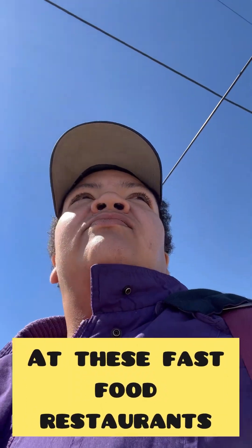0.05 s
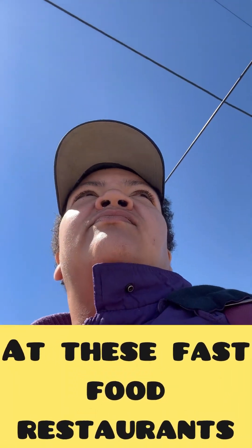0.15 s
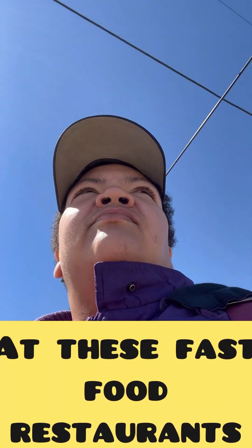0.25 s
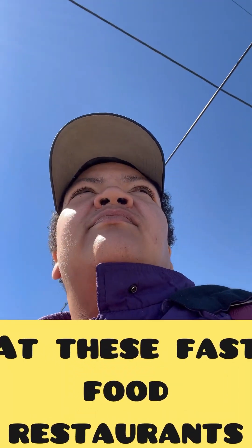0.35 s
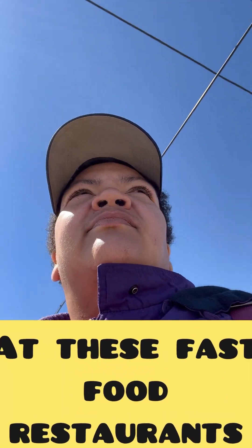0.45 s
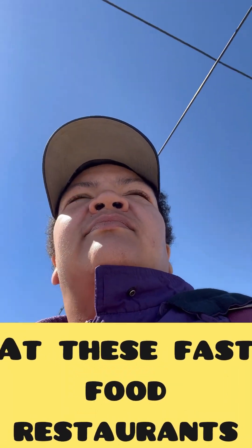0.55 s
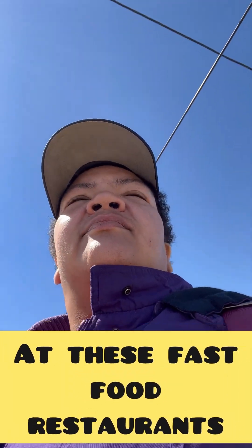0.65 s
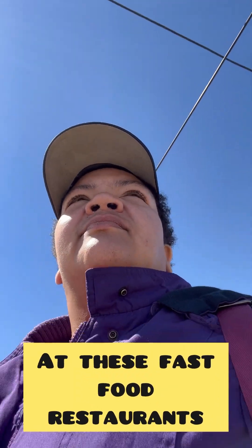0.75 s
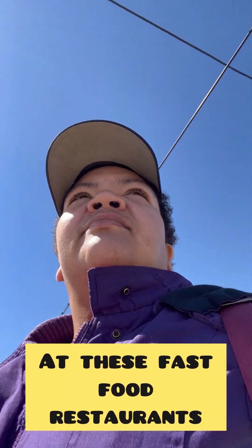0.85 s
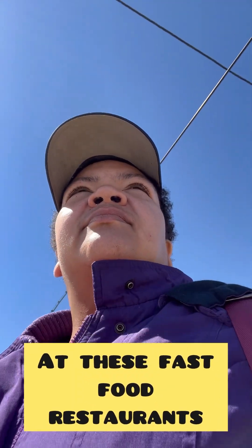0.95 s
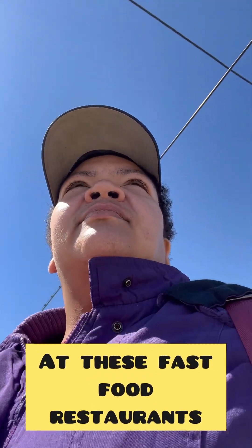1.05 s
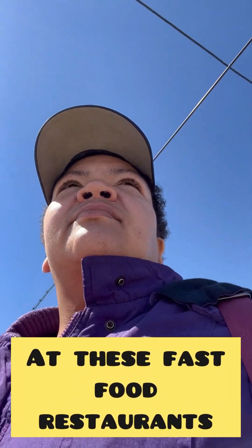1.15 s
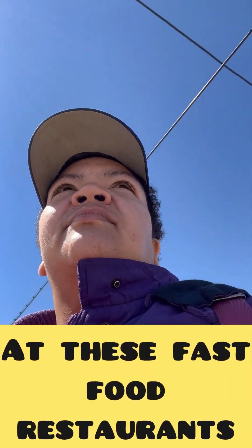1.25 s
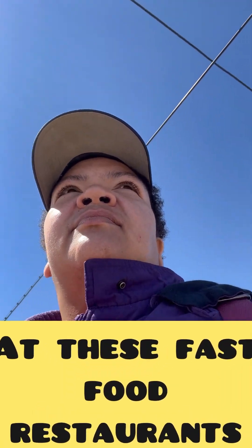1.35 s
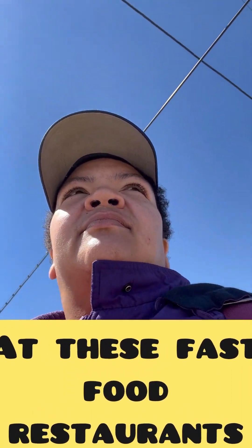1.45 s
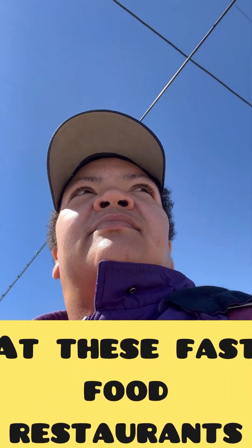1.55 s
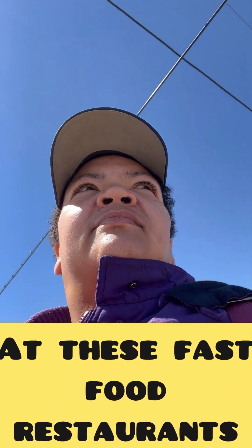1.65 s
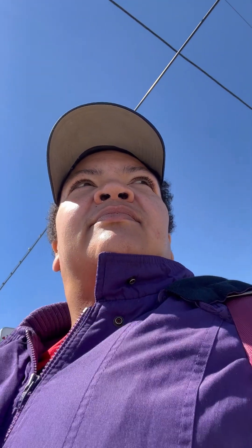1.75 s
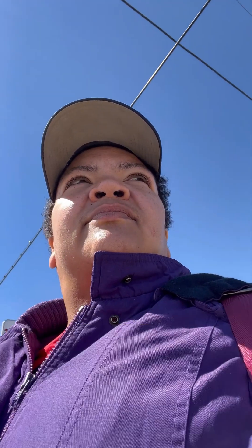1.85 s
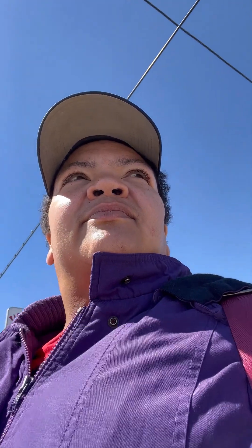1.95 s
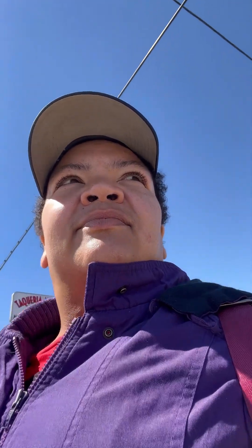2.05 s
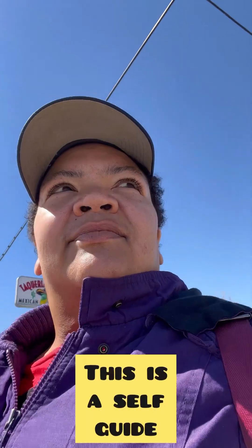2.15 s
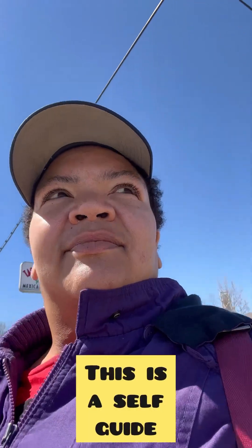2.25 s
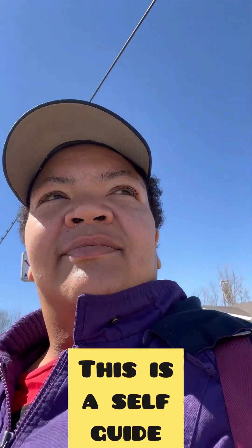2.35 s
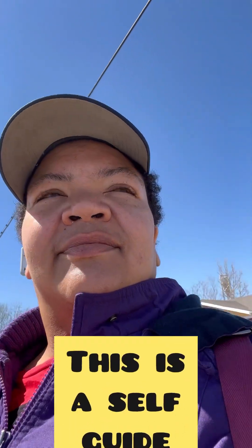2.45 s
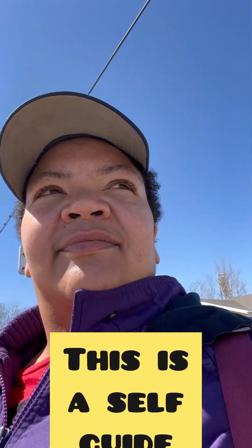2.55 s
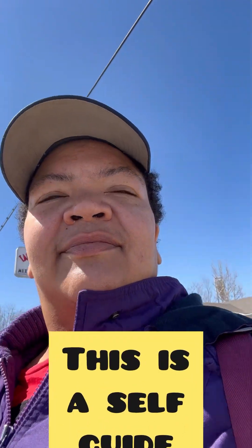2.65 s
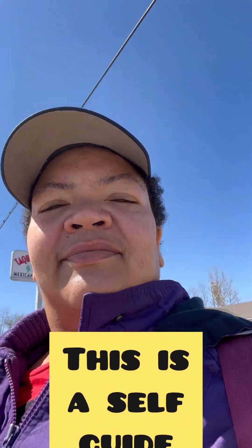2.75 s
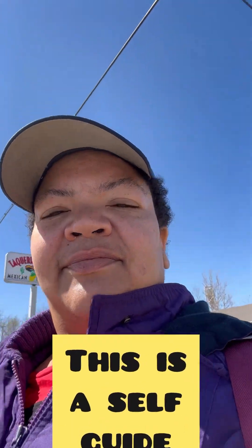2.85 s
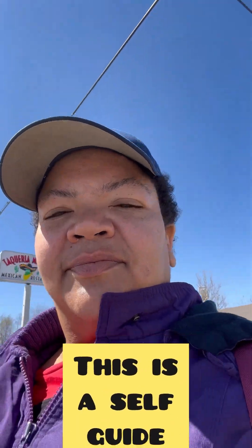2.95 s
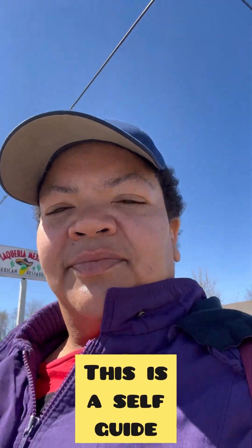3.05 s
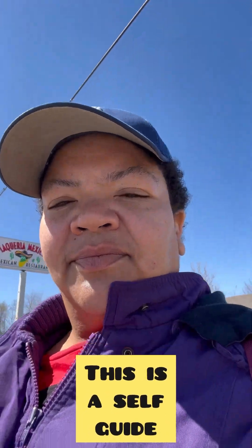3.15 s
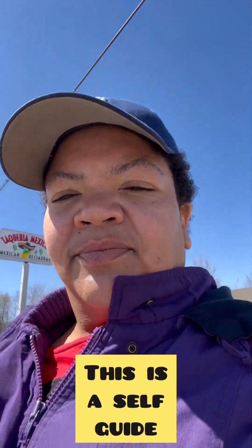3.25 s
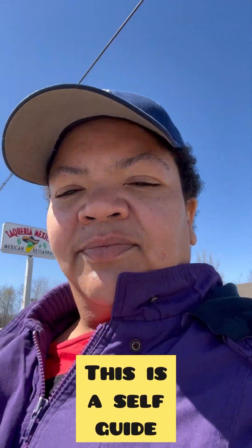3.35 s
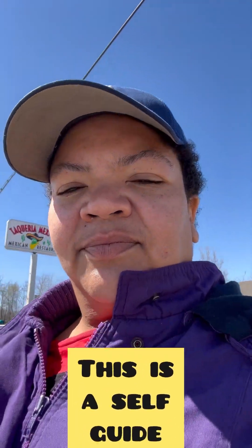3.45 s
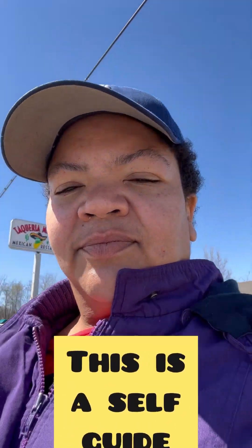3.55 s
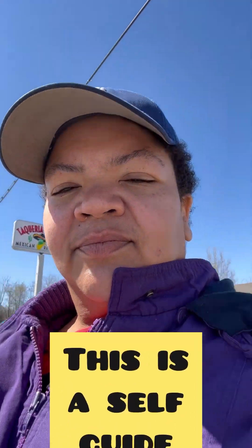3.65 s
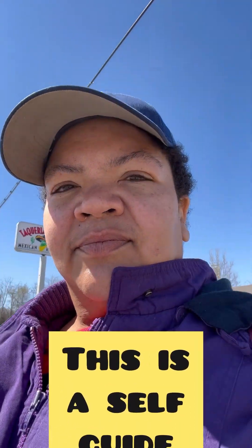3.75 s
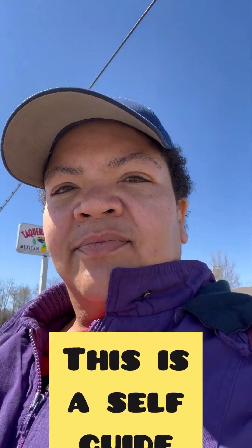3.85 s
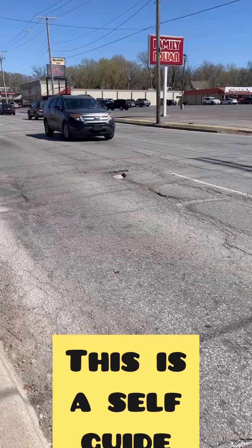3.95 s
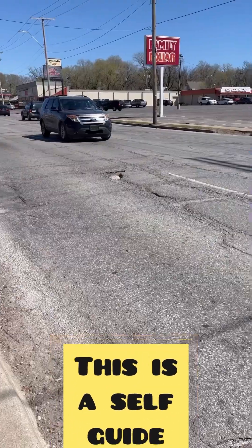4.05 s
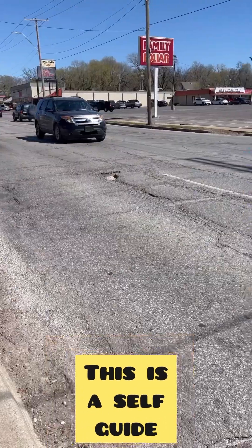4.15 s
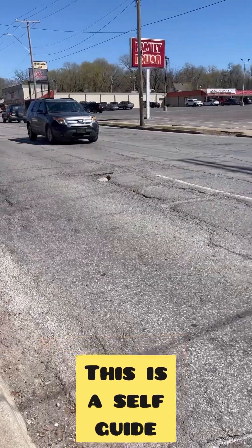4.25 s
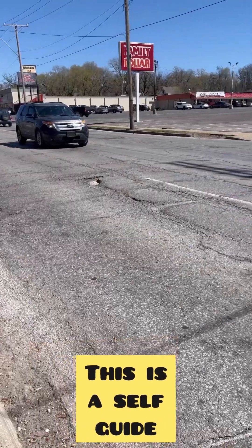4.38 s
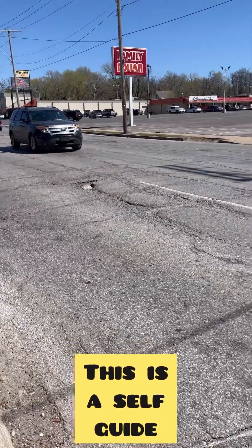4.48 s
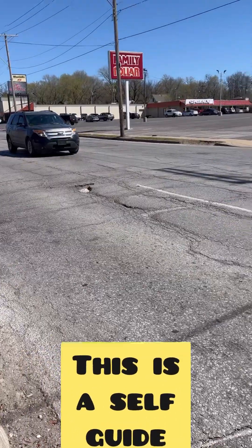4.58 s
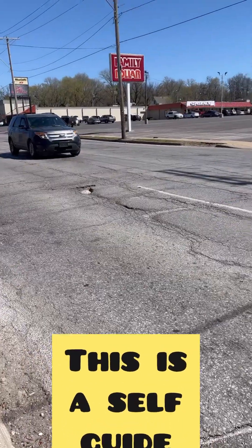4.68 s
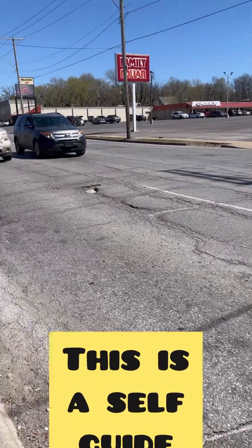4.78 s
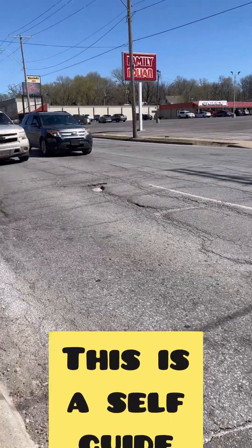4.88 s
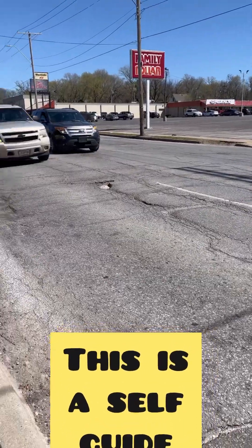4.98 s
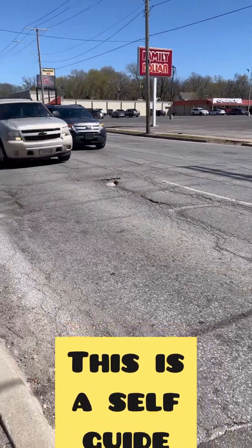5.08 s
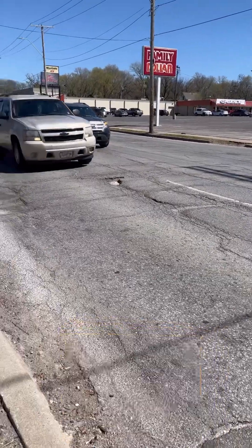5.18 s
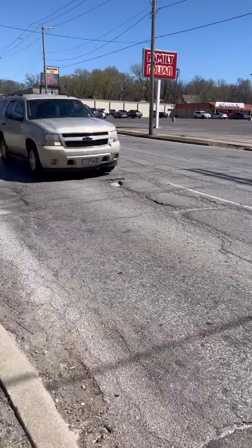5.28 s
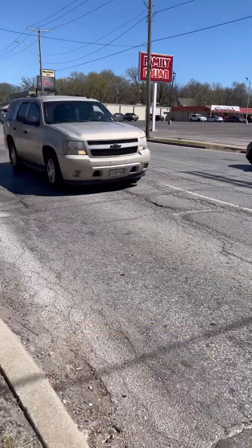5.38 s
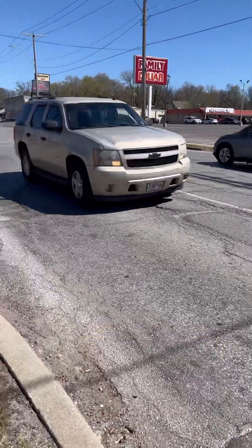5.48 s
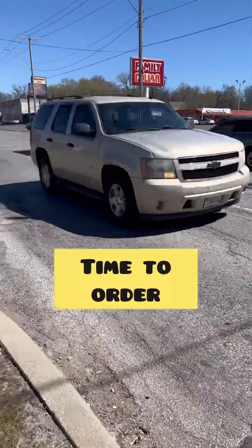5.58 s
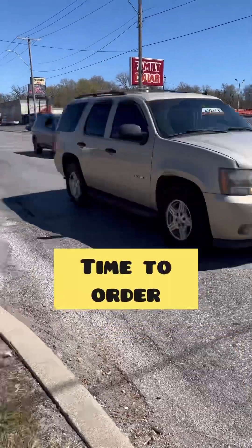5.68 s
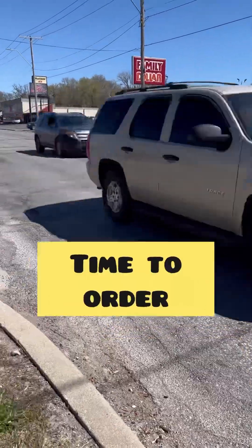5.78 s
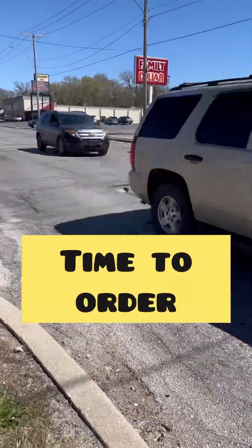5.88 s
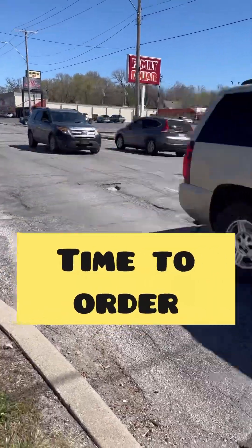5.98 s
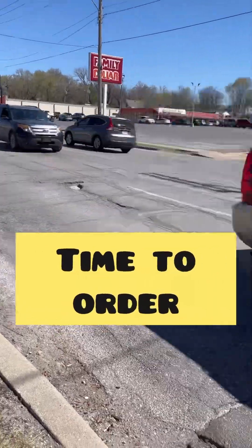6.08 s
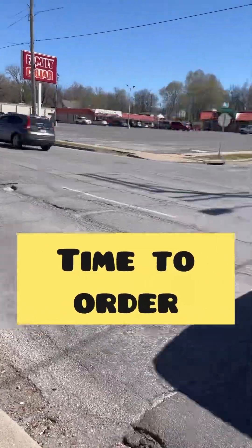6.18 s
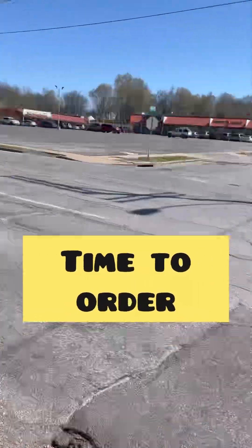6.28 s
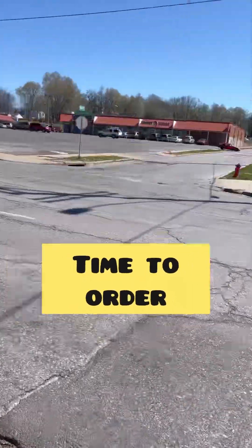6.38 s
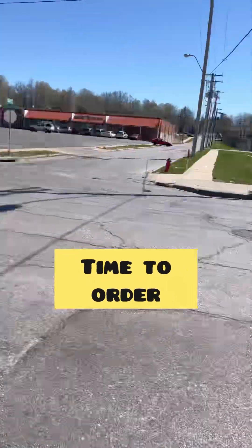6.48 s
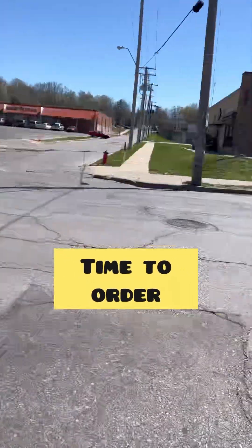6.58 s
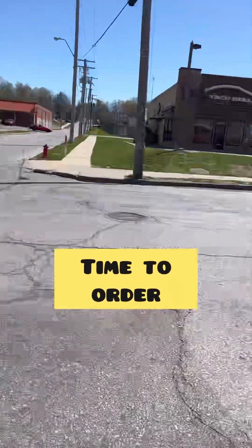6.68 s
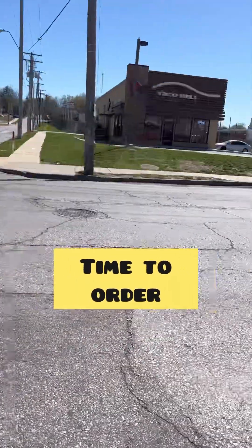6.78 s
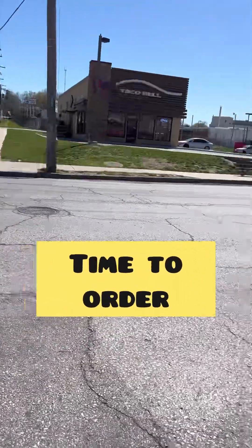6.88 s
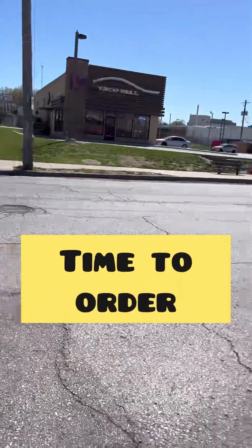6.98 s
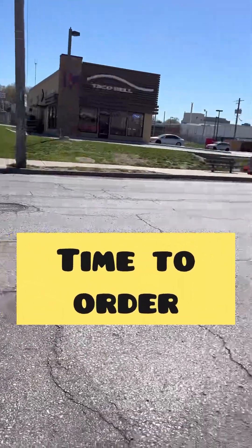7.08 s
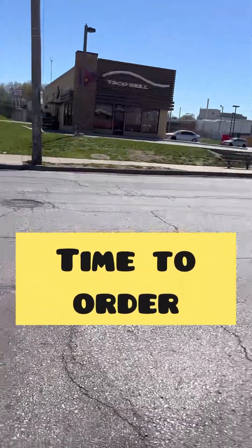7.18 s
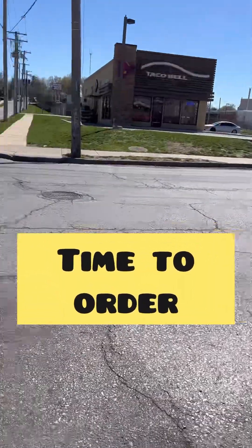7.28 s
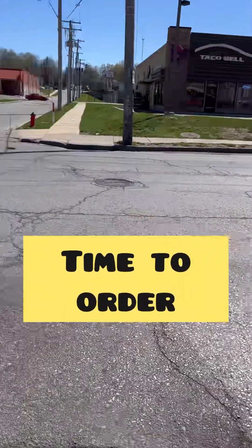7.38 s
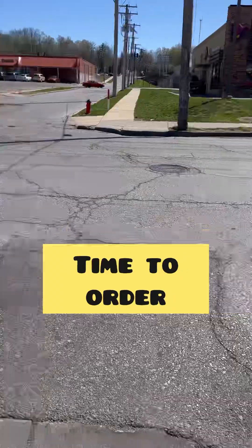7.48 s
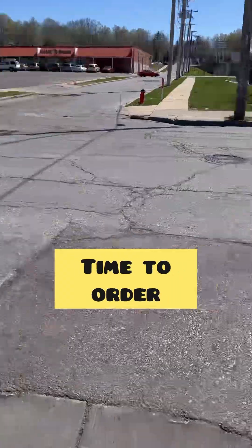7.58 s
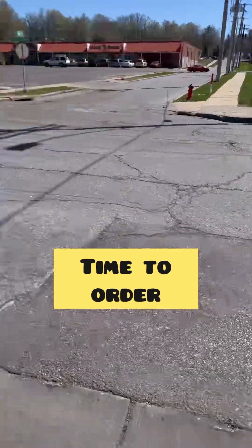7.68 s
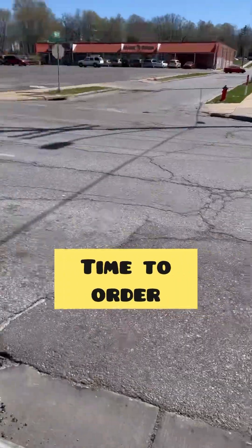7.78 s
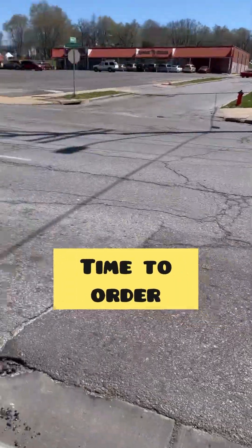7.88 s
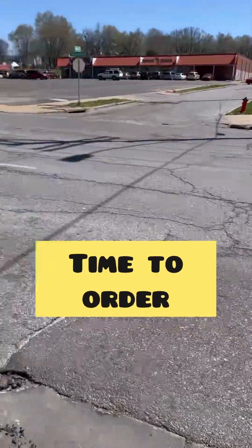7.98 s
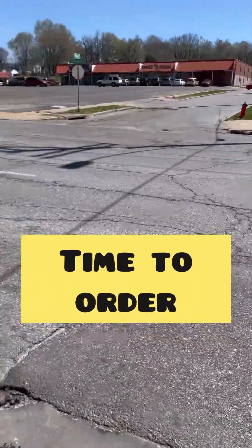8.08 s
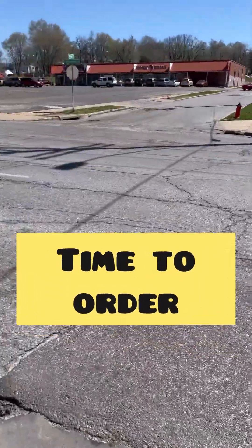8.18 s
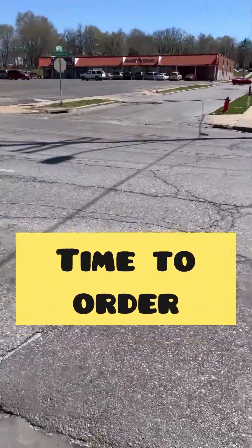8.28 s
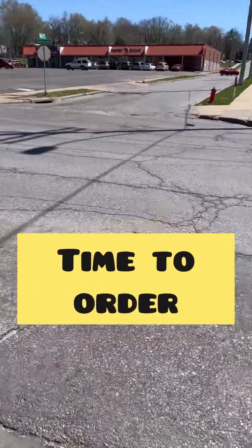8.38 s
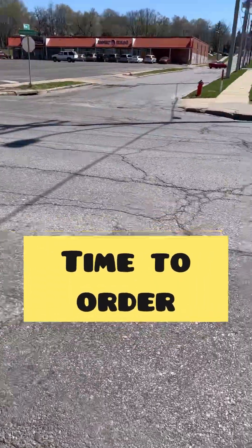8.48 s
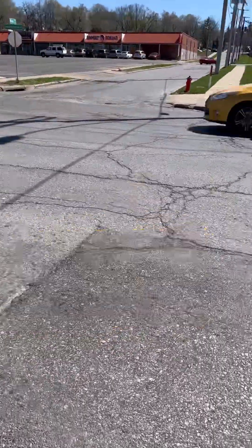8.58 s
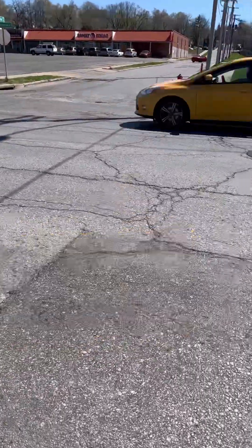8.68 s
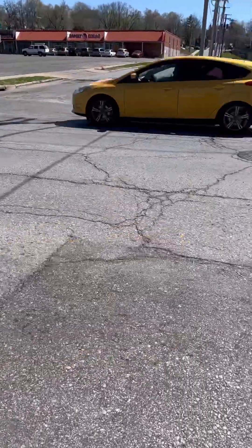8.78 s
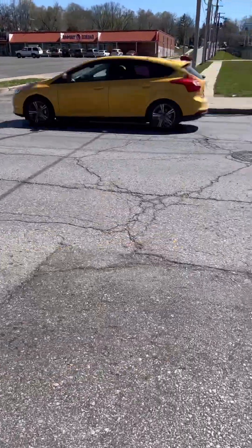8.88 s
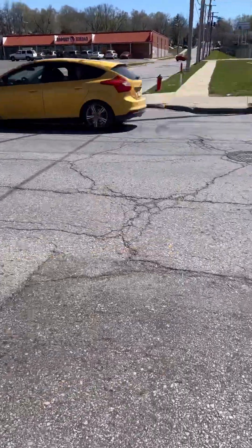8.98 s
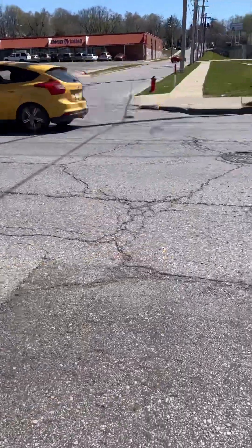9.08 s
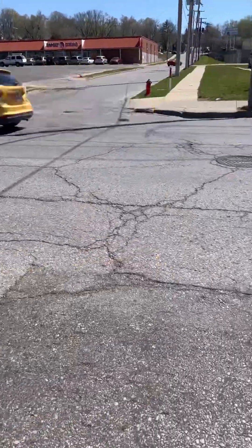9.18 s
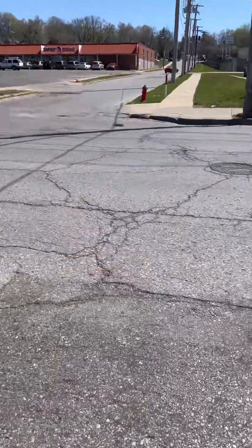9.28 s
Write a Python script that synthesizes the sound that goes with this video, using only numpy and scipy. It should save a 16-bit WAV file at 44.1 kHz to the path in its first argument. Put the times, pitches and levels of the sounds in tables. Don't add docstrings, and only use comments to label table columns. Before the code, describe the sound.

Outdoor kerbside traffic on a hand-held stereo phone, in two takes. From 0 s, low engine drones around a deep hum and broad tyre roar swell as vehicles pass, strongest near 0.4-0.9 s; wind buffets at the start and around 1.3-1.7 s, with a tiny sharp tick at once. Tyres slap a crack at about 1.65 s; a flurry of duller slaps and grit scrapes comes at 3.1-3.5 s. At 3.9 s an abrupt cut changes the street's tone. Faint, very high brake squeals fade over 4.0-4.9 s while cars roll by. A heavy gust hits at 5.45 s, then a large car roars past close, peaking around 5.95 s, with a hard knock at 5.9 s and softer knocks until 6.3 s. It recedes by 7 s. Thinner traffic follows, one knock at 7.5 s, then modest passes and rumbling wind from 8.5 s to the end at 9.3 s.

```python
import sys
import numpy as np
from scipy import signal
from scipy.fft import rfft, irfft, dct, next_fast_len
from scipy.io import wavfile
from scipy.ndimage import uniform_filter1d

SR = 44100
rng = np.random.default_rng(int(sys.argv[2]) if len(sys.argv) > 2 else 0)


def voltage_ratio(decibels):
    exponent = np.asarray(decibels, float) / 20
    return 10 ** exponent


def store_pcm(level_fs):
    pcm = np.round(np.clip(level_fs, -1, 1) * 32767).astype(np.int16)
    wavfile.write(sys.argv[1], SR, np.atleast_2d(pcm).T)


N = 411453
TIME = np.arange(N) / SR
CUT = 3.917
# (start [s], end [s])
SHOTS = [
    (0, CUT),
    (CUT, 9.34),
]
FRAME, GRID = 1024, 237


def unit(x):
    return x / np.sqrt(np.mean(x ** 2) + 1e-20)


def bell(x, width):
    return np.exp(-(x / width) ** 2)


def along(points, hz):
    f, *cols = np.transpose(points)
    outside = (-120, -120) if len(cols) == 1 else ()
    return [np.interp(np.log(hz + 1), np.log(f + 1), c, *outside) for c in cols]


def curves(rows):
    s, *cols = np.transpose(rows)
    return [np.interp(TIME, s, c) for c in cols]


def wobble(rate, size=N):
    knots = int(size * rate / SR) + 2
    return np.interp(np.arange(size) * rate / SR, np.arange(knots), rng.standard_normal(knots))


def filtered(x, response):
    m = next_fast_len(x.shape[-1] + 8192)
    return irfft(rfft(x, m) * response(np.fft.rfftfreq(m, 1 / SR)), m)[..., :x.shape[-1]]


def in_shot(rows, shot):
    return [row for row in rows if (row[0] > CUT) == shot]


def spans():
    return [slice(round(a * SR), min(round(b * SR), N)) for a, b in SHOTS]


def rush(spectrum, patchy_db, size, moving_db=lambda hz, t: 0):
    hz, t, z = signal.stft(rng.standard_normal((2, size + 512)), SR, nperseg=512)
    field = uniform_filter1d(rng.standard_normal(z.shape[1:]), size=6, axis=0)
    field = uniform_filter1d(field, size=14, axis=1)
    gain_db = patchy_db * unit(field) + moving_db(hz[:, None] + 1, t)
    pair = signal.istft(z * voltage_ratio(gain_db), nperseg=512)[1][:, :size]
    return unit(filtered(pair, lambda hz: voltage_ratio(along(spectrum, hz)[0])))


def tones(tracks, spread_hz, rate, shake_db, fade):
    out = np.zeros(N)
    for rows in tracks:
        span = slice(round(rows[0][0] * SR), round(rows[-1][0] * SR))
        hz, db = (c[span] for c in curves(rows))
        t = TIME[span]
        edge = np.clip(np.minimum(t - t[0], t[-1] - t) / fade, 0, 1)
        phase = 2 * np.pi * np.cumsum(hz + spread_hz * wobble(rate, size=len(t))) / SR
        out[span] += edge * voltage_ratio(db + 2.5 + shake_db * wobble(rate, size=len(t))) * np.sin(phase)
    return out


def wind():
    # (peak time [s], peak level [dB], length [s])
    gust_rows = [(.14, -34, .18), (1.25, -38, .13), (1.72, -37, .15), (3.36, -46, .06), (5.45, -25, .1),
                 (5.85, -33, .06), (6.28, -41, .12), (6.55, -39, .1), (7.95, -44, .06), (8.55, -31, .2),
                 (8.9, -34, .2), (9.27, -37, .08)]
    # (frequency [Hz], density [dB per Hz])
    buffet_colour = [(25, -28), (50, -0.5), (90, 1), (180, -6.5), (350, -14.5), (800, -43)]
    lumps = voltage_ratio(3.5 * np.array([wobble(16), wobble(12)]))
    calm_db = -63
    strength = voltage_ratio(calm_db) + sum(voltage_ratio(db) * bell(TIME - s, length) for s, db, length in gust_rows)
    return strength * unit(lumps * rush(buffet_colour, patchy_db=0.0, size=N))


def ticks():
    # (time [s], peak level [dB], centre [Hz], t60 [s])
    grit_hits = [
        (.0585, -33, 13000, .006),
        (.9607, -47, 14500, .012),
        (3.08, -39, 2700, .03),
        (3.329, -42, 5000, .04),
        (3.4745, -50, 14500, .006),
        (3.6107, -50, 14500, .006),
    ]
    out, t = np.zeros((2, N + SR)), np.arange(SR // 20) / SR
    for s, db, hz, t60 in grit_hits:
        band = signal.butter(3, [hz * .75, hz * 1.25], "band", fs=SR)
        spit = unit(signal.lfilter(*band, rng.standard_normal((2, len(t)))))
        start = round(s * SR)
        out[:, start:start + len(t)] += voltage_ratio(db - 60 * t / t60) * spit
    return out[:, :N]


def brake_squeals():
    # (start [s], length [s], pitch [Hz], level [dB], fall [dB/s])
    squeal_rows = [
        (4.027, 0.15, 12500, -55.5, 50),
        (4.283, .6, 13500, -61, 27),
        (5.984, .17, 10640, -68.5, -150),
        (7.35, .6, 13500, -83, -4),
    ]
    tracks = [[(s, hz, db), (s + length, hz, db - fall * length)]
              for s, length, hz, db, fall in squeal_rows]
    return tones(tracks, spread_hz=120, rate=330, shake_db=7.0, fade=0.015)


def passing_db(t, at, passing):
    return -10 * np.log10(1 + ((t - at) / passing) ** 2)


def traffic_db(shot, t):
    # (rumble [dB], roar [dB], hiss [dB], fizz [dB])
    far_street_db = [
        (-29, -41, -56.5, -81.5),
        (-33.5, -42.5, -59, -82.5),
    ]
    exhaust_db = [-5, -0.5]
    distance_laws = [1.12, 1.15, 1.45, 1.94]
    # (closest [s], passing time [s], tyre roar [dB],
    # tread hiss over roar [dB], air fizz over roar [dB])
    vehicles = [(.05, 0.27, -34.5, -19, -25.5), (.4, 0.39, -30, -12, -26), (.9, 0.3, -27.5, -19, -34.5),
                (1.3, 0.25, -36, -7.5, -26.5), (1.8, .35, -41.5, -3, -30.5), (2.2, 0.36, -35, -12.5, -38.5),
                (2.7, 0.36, -33.5, -12.5, -36), (3.3, 0.26, -44, -22, -32), (3.75, 0.52, -33, -14, -40.5),
                (4.0, 0.23, -46.5, -18, -45), (4.5, 0.41, -39.5, -11.5, -32.5),
                (5.0, 0.37, -35.5, -23.5, -34), (5.45, 0.32, -32.5, -16.5, -34),
                (5.95, 0.32, -24.5, -19.5, -34), (6.25, 0.28, -26.5, -31, -36.5),
                (6.9, 0.41, -33, -23.5, -38.5), (7.85, 0.23, -45.5, -14.5, -36),
                (8.2, 0.48, -38.5, -14.5, -31.5), (8.75, 0.42, -37.5, -15.5, -29.5),
                (9.2, 0.16, -38.5, -14.5, -29.5)]
    power = voltage_ratio(2 * np.array(far_street_db[shot]))[:, None] + 0 * t
    for at, passing, roar_db, hiss_db, fizz_db in in_shot(vehicles, shot):
        own_db = roar_db + np.array([exhaust_db[shot], 0, hiss_db, fizz_db])
        power = power + voltage_ratio(2 * (own_db[:, None] + np.outer(distance_laws, passing_db(t, at, passing))))
    return 10 * np.log10(power)


def road(shot, span):
    # (frequency [Hz], density [dB per Hz])
    rumble_colour = [
        [(25, -26), (45, -6.5), (70, -2), (120, -3.5), (220, -4.5), (330, -11.5), (520, -20.5)],
        [(25, -33), (45, -4.5), (70, -2.5), (120, -5), (220, -5.5), (330, -12), (520, -17)],
    ]
    roar_base = [
        [(260, -19), (400, -5.5), (560, -3), (800, -3.5), (1100, -4.5), (1600, -6), (2050, -9.5), (2500, -12.5),
         (3300, -27.5)],
        [(260, -24), (400, -2), (560, -6), (750, -3), (1100, -6.5), (1600, -9.5), (2100, -15), (2700, -21.5),
         (3600, -51)],
    ]
    hiss_base = [
        [(2000, -34.5), (2800, 1.5), (3600, -2.5), (4500, -8.5), (5600, -11), (7000, -13.5), (9000, -34)],
        [(2000, -12.5), (2800, -6), (3600, -3.5), (4500, -8.5), (5600, -8), (7000, -12.5), (9000, -28)],
    ]
    fizz_base = [
        [(6000, -18.5), (7500, 0.5), (9500, -3), (12000, -1), (14000, -6), (14900, -7.5), (15780, -15)],
        [(6000, -41), (7500, 0.5), (9500, -1.5), (12000, -3), (14000, -6.5), (15780, -10)],
    ]
    # (roar [dB], hiss over roar [dB], fizz over hiss [dB])
    usual_db = [
        (-31.5, -13, -20.5),
        (-32.5, -21, -16.5),
    ]
    # (usual [dB/octave], per dB of roar, per dB of hiss share [dB/octave/dB])
    roar_tilt = [
        (0.69, -0.46, 0.31),
        (-1.28, -0.17, 0.63),
    ]
    # (usual [dB/octave], per dB of fizz share [dB/octave/dB])
    hiss_slope = [
        (-0.038, 0.54),
        (-0.45, 1),
    ]
    # (time [s], length [s],
    # centre [Hz], depth [dB])
    hollows = [(.05, 0.35, 450, -1), (0.49, .3, 510, 2), (1.1, 0.13, 580, 4.5), (2.25, 0.22, 500, -5),
               (2.898, 0.23, 545, 3), (3.5, 0.52, 440, 7), (4.65, 0.38, 460, -3.5), (5.2, 0.54, 520, 2.5),
               (5.52, 0.58, 480, 8.5), (5.8, 0.12, 950, 4), (5.1, 0.1, 980, -2), (3.66, .12, 1100, 2),
               (5.36, 0.21, 780, 3), (5.5, 0.055, 1000, 0.5), (5.4, .12, 300, -1), (3, .12, 330, -7),
               (6.42, .08, 170, -4), (5.9, 0.21, 310, -4), (5.45, .15, 1370, -4), (.12, 0.13, 1260, -3),
               (1.33, 0.084, 780, -2.5), (6.22, 0.23, 870, 3), (1.1, .15, 400, -2.5), (.8, 0.13, 1100, -2),
               (9.1, .15, 1300, 5), (6.33, 0.25, 466, 7.5), (7.15, 0.41, 486, 6), (8.85, 0.36, 430, 5.5)]
    # (time [s], length [s], pitch [Hz],
    # boost [dB])
    whines = [(.5, .25, 3000, 1.5), (1.15, 0.28, 4040, 3), (2.305, 0.1, 3630, 6), (2.498, .12, 3580, 7),
              (2.726, 0.075, 4070, 7.5), (2.86, 0.076, 3500, 8.5), (2.97, .1, 3020, 3),
              (3.5, 0.85, 2580, 12.5), (3.8, 0.12, 2600, 1), (4.05, 0.15, 4200, 4), (4.08, .17, 5700, -2),
              (4.05, .15, 5000, -2), (3.08, .02, 2800, 10.5), (8.8, .3, 3730, 1), (1.1, .1, 5000, 4.5),
              (3.96, 0.071, 3500, 5), (4.247, 0.24, 3230, 5.5), (4.8, 0.23, 2650, 12),
              (5.7, 0.47, 2400, 16), (5.8, 0.24, 4100, 2), (6.3, 0.35, 5600, 4.5), (6.55, 0.26, 3500, 6.5),
              (7.9, 0.33, 2630, 7), (8.7, 1, 2480, 16)]
    # (time [s], boost [dB], length [s])
    puffs = [(0.062, 1, 0.015), (.42, 4, 0.025), (0.505, 3, 0.018), (0.733, 6, .05), (.96, 4, 0.024),
             (2.6, -1, 0.017), (3.331, 3, .02), (3.47, 2, .015), (5.69, 6, .03), (8.602, 2, .03),
             (8.987, 6.5, 0.057)]
    # (time [s], rumble boost [dB], length [s])
    thuds = [
        (1.15, 2, 0.19),
        (1.646, 2, 0.29),
        (3.37, 6, 0.065),
        (4.85, 3.5, 0.4),
        (5.71, 0.5, 0.22),
    ]
    size = len(TIME[span])
    start = SHOTS[shot][0]
    coarse = TIME[span][::256]

    def smooth(values):
        return np.interp(TIME[span], coarse, values)

    def shares(t):
        _, roar, hiss, fizz = traffic_db(shot, t + start)
        return np.array([roar, hiss - roar, fizz - hiss]) - np.array(usual_db[shot])[:, None]

    def roar_colour(hz, t):
        loud, hissy, _ = shares(t)
        usual, per_roar, per_hiss = roar_tilt[shot]
        tilt = usual + per_roar * loud + per_hiss * hissy
        hollow_db = sum(db * bell(t + start - at, length) * bell(np.log2(hz / pitch), 0.32)
                        for at, length, pitch, db in in_shot(hollows, shot))
        return tilt * np.clip(np.log2(hz / 1000), -2, 2) - hollow_db

    def hiss_colour(hz, t):
        whine_db = 0
        for at, length, pitch, db in in_shot(whines, shot):
            octaves = np.where((hz > pitch) | (db < 0), .12, .4)
            whine_db = whine_db + db * bell(t + start - at, length) * bell(np.log2(hz / pitch), octaves)
        usual, per_fizz = hiss_slope[shot]
        return (usual + per_fizz * shares(t)[2]) * np.clip(np.log2(hz / 4000), -2, 2) + whine_db

    rumble_db, roar_db, hiss_db, fizz_db = (smooth(c) for c in traffic_db(shot, coarse))
    puff_db, thud_db = (smooth(sum(db * bell(coarse - at, length) for at, db, length in rows))
                        for rows in (puffs, thuds))
    surge = wobble(8, size=size)
    rumble_db = rumble_db + thud_db + [.4, .3][shot] + 0.087 * surge
    roar_db = roar_db + [1.6, 1.2][shot] + 0.64 * surge
    hiss_db = hiss_db + [3.1, 3.2][shot] + .5 * surge + 0.28 * puff_db
    fizz_db = fizz_db + [6.1, 6.2][shot] + 0.63 * surge + puff_db + 0.98 * wobble(16, size=size)
    rumble = voltage_ratio(rumble_db) * rush(rumble_colour[shot], patchy_db=1.27, size=size)
    roar = voltage_ratio(roar_db) * rush(roar_base[shot], patchy_db=1.1, size=size, moving_db=roar_colour)
    hiss = voltage_ratio(hiss_db) * rush(hiss_base[shot], patchy_db=1.44, size=size, moving_db=hiss_colour)
    fizz = voltage_ratio(fizz_db) * rush(fizz_base[shot], patchy_db=1.5, size=size)
    return rumble + roar + hiss + fizz


def knocks():
    # (time [s], peak level [dB], ring [Hz], t60 [s], grit level [dB])
    crack_hits = [(1.613, -22, 1023, 0.011, -32), (1.6647, -13.5, 800, 0.017, -38),
                  (1.6652, -18, 1250, .012, -38), (3.334, -21, 190, .03, -50),
                  (3.3845, -19, 190, .025, -50), (3.315, -21.5, 1850, 0.014, -40),
                  (3.329, -25, 917, 0.012, -27), (3.377, -21.5, 849, 0.0091, -34),
                  (3.464, -27, 904, 0.012, -36.5), (3.518, -27, 1480, 0.014, -38),
                  (5.696, -19, 568, 0.01, -33), (5.9084, -3, 620, 0.008, -46),
                  (6.0612, -13, 900, 0.015, -42), (6.104, -15, 420, .016, -44),
                  (6.138, -12, 520, .016, -44), (6.2, -16, 950, .014, -44), (6.266, -16, 1000, .012, -42),
                  (7.4918, -16, 850, 0.015, -44)]
    out, t = np.zeros(N + SR), np.arange(SR // 20) / SR
    band = signal.butter(2, [2500, 6500], "band", fs=SR)
    for s, db, hz, t60, grit_db in crack_hits:
        modes = sum(gain * np.sin(2 * np.pi * ratio * hz * t)
                    for ratio, gain in ((1, 1), (1.4, 0.19), (0.51, .6)))
        ring = voltage_ratio(-60 * t / t60) * modes * (1 - np.exp(-t / 0.0011))
        grit = signal.lfilter(*band, rng.standard_normal(len(t))) * voltage_ratio(grit_db + 10.5 - 60 * t / 0.058)
        out[round(s * SR):][:len(t)] += voltage_ratio(db + 6.5) * (ring + grit)
    return out[:N]


def engines():
    # (loudest [s], passing time [s], pitch [Hz], glide [Hz/s], level [dB])
    firing_tones = [(.1, 0.22, 76, 1, -30), (.65, .18, 72, -22.5, -30), (1.0, .35, 75.7, 4.5, -37.5),
                    (1.548, .2, 81.2, -1, -35), (1.95, 0.298, 68.3, 6.5, -30.5), (2.452, 0.306, 72, 3, -30),
                    (3.45, .6, 74.5, 5, -33), (.7, 0.5, 142.1, -2, -41.5), (1.66, 0.2, 193.5, -2.5, -28),
                    (.72, .2, 228, 11, -33), (1.0, .06, 329, 11, -34), (2.8, .2, 237, -27.5, -34),
                    (3.55, .3, 224, 13.5, -37), (4.25, 0.34, 96, 21.5, -32), (4.9, 0.37, 101, -2.5, -36),
                    (5.83, 0.098, 78, 80, -20.5), (5.97, .05, 88, 20, -21.5), (6.2, 0.18, 62, 8, -23),
                    (6.55, .2, 61.85, -4, -25.5), (7.03, .25, 57.5, -4, -38), (5.37, 0.053, 157, 3, -27.5),
                    (5.581, 0.116, 157, -5.5, -32.5), (6.33, 0.047, 110, 7, -22), (6.8, .2, 97, -3, -32.5),
                    (3.25, .2, 228, -10, -34), (2.2, .4, 190, 7.5, -35.5), (8.11, .05, 125, 5, -34),
                    (8.36, .06, 125, 14, -31), (8.68, .1, 68, -22, -33.5), (9.12, .05, 270, 3, -35.5),
                    (6.08, .06, 204, -4, -31), (6.29, .07, 203, 6, -28), (6.5, .25, 200, -17.5, -32),
                    (7.6, .4, 102, 1, -34), (8.25, 0.404, 102.5, -3, -36), (9.08, 0.192, 93, -15, -31.5)]
    distance_law, heard = 2.2, 2.5
    tracks = []
    for at, passing, hz, glide, db in firing_tones:
        a, b = SHOTS[int(at > CUT)]
        s = np.linspace(max(a, at - heard * passing), min(b, at + heard * passing), 21)
        level_db = db + distance_law * passing_db(s, at, passing)
        tracks.append(np.transpose([s, hz + glide * (s - at), level_db]))
    return tones(tracks, spread_hz=1.4, rate=12, shake_db=1.5, fade=.08)


def ports(pair, shot):
    # (frequency [Hz], lag [rad], left louder [dB], likeness [0-1])
    port_rows = [
        [(60, .05, 0, 0.99), (252, 0.2, -1, 0.98), (443, 1.16, -1.5, 0.78), (627, 2.34, 7, 0.6),
         (884, 0.85, 11.5, 0.75), (1250, 0.92, 9.5, 0.78), (1780, 0.31, 10.5, 0.93), (2250, 1.76, 4, 0.94),
         (3000, 2.82, 2, 0.78), (4660, 1.94, 1.5, 0.2), (5860, 0.93, 1, .75), (9150, 2.95, -2, 0.9),
         (11570, 4.66, -2, .85), (13200, 6.1, -1, .8), (15700, 6.5, -3.5, .8)],
        [(60, -.03, 0, .996), (220, -.22, 0, .99), (480, -1.1, 0, .95), (690, -1.2, -6, .91),
         (1100, -.8, -5, .87), (1500, -.3, -2, .92), (1800, 0, 0, .985), (2250, 0, 0, .92),
         (2780, -3, -7, 0.32), (3500, 3, -2.5, 0.4), (4845, 0.76, -1, 0.79), (6030, 3.14, 0, .9),
         (8300, 6.28, 0, .8), (12640, 12.5, -2, 0.9), (14200, 15, 5, .9), (15100, 16, 0, .92),
         (15700, 17.4, -1, .9)],
    ]

    def response(hz):
        lag, left_db, alike = along(port_rows[shot], hz)
        alike = np.clip(alike, 0, 1)
        right = voltage_ratio(-left_db / 2) * [alike * np.exp(-1j * lag), np.sqrt(1 - alike ** 2)]
        return np.array([[voltage_ratio(left_db / 2), 0 * hz], right])
    return filtered(pair[None], response).sum(axis=1)


def scene():
    near = engines() + knocks()
    far = brake_squeals()
    scattered = 0.18 * near + 1.24 * np.roll(far, 37)
    both = np.array([near + far, scattered])
    street = [ports(road(shot, span) + both[:, span], shot) for shot, span in enumerate(spans())]
    return np.concatenate(street, axis=1) + wind() + ticks()


def lapped(x):
    rise = np.cumsum(np.kaiser(FRAME + 1, 4 * np.pi))
    window = np.sqrt(np.r_[rise[:-1], rise[-2::-1]] / rise[-1])
    hops = np.pad(x, ((0, 0), (FRAME - GRID, 2 * FRAME)))
    hops = hops[:, :hops.shape[1] // FRAME * FRAME].reshape(2, -1, FRAME)
    frames = np.concatenate([hops[:, :-1], hops[:, 1:]], axis=2) * window
    a, b, c, d = np.split(frames, 4, axis=2)
    folded = np.concatenate([-c[..., ::-1] - d, a - b[..., ::-1]], axis=2)
    return dct(folded, 4, norm="ortho"), window


def unlapped(z, window):
    late, early = np.split(dct(z, 4, norm="ortho"), 2, axis=2)
    frames = np.concatenate([early, -early[..., ::-1], -late[..., ::-1], -late], axis=2) * window
    first, second = np.split(frames, 2, axis=2)
    first[:, 1:] += second[:, :-1]
    return first.reshape(2, -1)[:, FRAME - GRID:][:, :N]


def thinned(x):
    # (frequency [Hz], ratio [dB], unheard below [dB])
    empty_rows = [(1000, -44, -130), (1770, -19.5, -130), (4860, -3.5, -110), (6450, -9.5, -104),
                  (7200, -3, -101), (12050, -4, -99), (14200, -5, -99.5), (15000, -3.5, -100),
                  (15700, -1, -104)]
    # (frequency [Hz], least patch share of block power [ratio],
    # least single-bin share [ratio])
    coarse_rows = [(1500, 0.08, .006), (3000, .36, .035), (5500, .4, .06), (9000, .55, .12),
                   (12000, .9, .27), (14500, 1.1, .35)]
    # (frequency [Hz], share [0-1], waver of the ratio [dB])
    short_rows = [(5000, 0, .5), (10000, 0, 1.2), (13000, .03, .8), (14300, .3, .8), (15000, .55, 1),
                  (15750, .92, 2.5)]
    z, window = lapped(np.array([x[0] + x[1], x[0] - x[1]]) / 2)
    count = z.shape[1]
    hz = (np.arange(FRAME) + .5) * SR / 2 / FRAME
    ratio_db, faint_db = along(empty_rows, hz)
    patch, single = along(coarse_rows, hz)
    share, waver_db = along(short_rows, hz)
    faint_db = faint_db + 1.5 * np.repeat(rng.standard_normal(count), 2)[:count, None]

    power = z ** 2 * voltage_ratio(-62.6)
    held = uniform_filter1d(power, size=2, axis=1)
    block = np.repeat(held.reshape(2, -1, FRAME // 16, 16).mean(axis=3), 16, axis=2)
    near = uniform_filter1d(held, size=6, axis=2)

    frame_s = (np.arange(count)[:, None] * FRAME + GRID) / SR
    ratio_db = ratio_db + 9 * bell(frame_s - 4.05, .16) * bell(np.log2(hz / 5450), .08)

    def per_block(draw):
        return np.repeat(draw((count // 2 + 1, FRAME // 16)), 2, axis=0).repeat(16, axis=1)[:count]

    luck, waver = per_block(rng.random), per_block(rng.standard_normal)
    treble = power[..., 660:].sum(axis=(0, 2))
    sudden = treble > 5 * uniform_filter1d(treble, size=15)
    kept = (luck > share) & (block > block[::-1] * voltage_ratio(2 * (ratio_db + waver_db * waver)))
    kept = kept & (block > voltage_ratio(2 * faint_db - 3.5)) & (near > voltage_ratio(2 * faint_db - 2.5))
    fine = (near > patch * block) & (power > single * block)
    mid, side = unlapped(z * ((kept | sudden[:, None]) & fine), window)
    return np.array([mid + side, mid - side])


def top_cut(x):
    return signal.sosfilt(signal.butter(12, 15850, fs=SR, output="sos"), x)


def record(dry):
    closing = np.clip((CUT - TIME) * 2000, 0, 1)
    opening = np.clip(.1 + (np.maximum(TIME - CUT, 0) / .03) ** 1.2, 0, 1)
    mix = thinned(dry * np.where(TIME < CUT, closing, opening))
    return top_cut(mix)


dry = scene()
out = record(dry)
store_pcm(out)
```